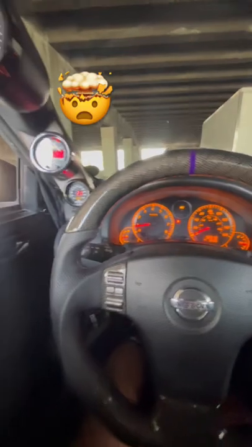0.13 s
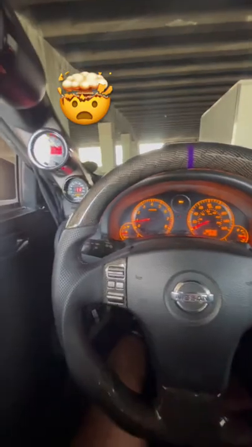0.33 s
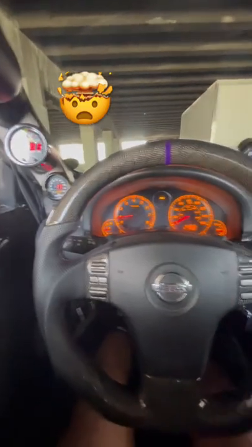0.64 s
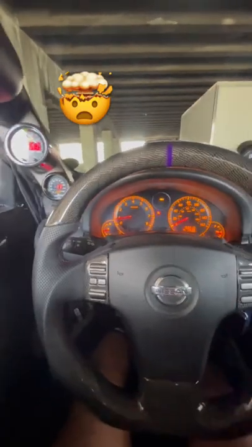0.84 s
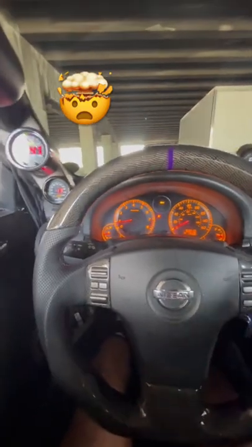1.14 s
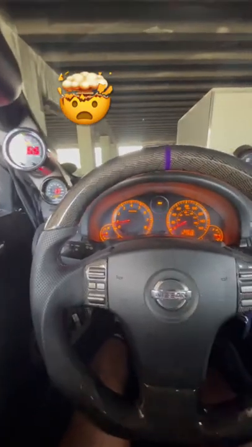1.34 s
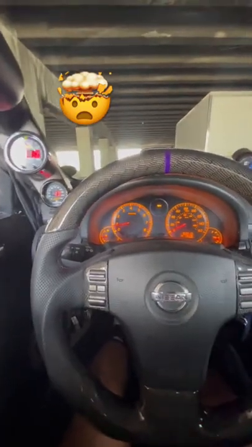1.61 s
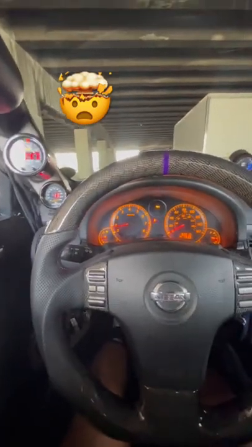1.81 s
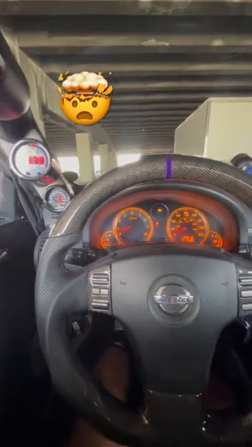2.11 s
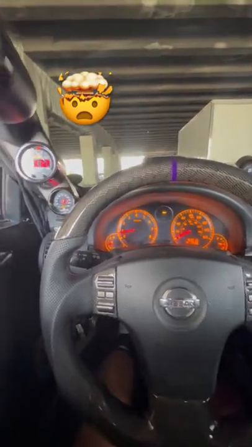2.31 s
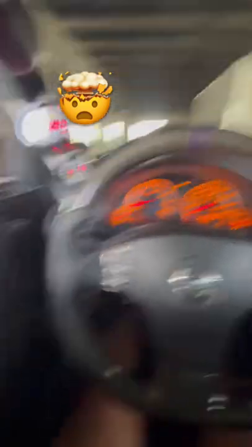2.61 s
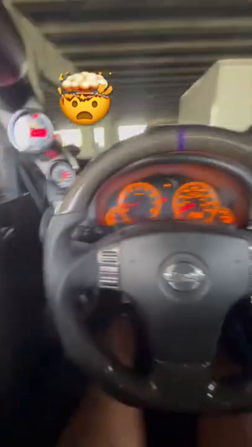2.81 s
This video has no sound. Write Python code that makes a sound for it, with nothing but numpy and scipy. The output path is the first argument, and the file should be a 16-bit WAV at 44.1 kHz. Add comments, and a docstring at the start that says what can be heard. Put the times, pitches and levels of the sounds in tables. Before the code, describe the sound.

A car engine drones throughout, heard inside the cabin on a handheld microphone: a low, fluttering, nearly steady hum over boomy rumble and dull mechanical roar. A very faint air puff comes near 1.7 seconds. At about 2.35 a turbo valve releases a clear ringing hiss, with an after-puff at 2.5 and a thin high whine around it. From 2.6 a breathy whistle swells to the end.

```python
"""Car cabin with engine drone and valve hiss

Inside a car with the engine running: wavering sine lines at the firing tone and other crank orders drone
among boomy cabin resonances of filtered noise, over a wide engine-bay roar and a second rotor's steady lines.
Air hisses from the intake valve as shaped noise, once faintly and once in a clear burst with an after-puff;
a thin whine arches around the burst, and a breathy whistle of resonant noise swells at the end."""
import sys
import numpy as np
from scipy import signal
from scipy.fft import rfft, irfft
from scipy.io import wavfile

SR = 44100
rng = np.random.default_rng(int(sys.argv[2]) if len(sys.argv) > 2 else 0)


def inscribe(sig):
    """Save sig as 16-bit PCM at rate SR to the path in sys.argv[1].

    A 1-D sig is mono; a 2-D sig holds one channel per row.
    Samples are clipped to [-1, 1] before scaling.
    """
    pcm = np.round(np.clip(np.atleast_2d(sig).T, -1, 1) * 32767)
    wavfile.write(sys.argv[1], SR, pcm.astype(np.int16))


N = 130095


def amp(db):
    """Turns decibels into an amplitude factor."""
    return 10 ** (np.asarray(db) / 20)


def rms_one(x):
    """Scales a signal to rms 1."""
    return x / np.sqrt(np.mean(x ** 2) + 1e-20)


def over_time(points, t):
    """Reads a (time, value) table in straight lines."""
    return np.interp(t, *np.transpose(points))


def at_hz(points, hz):
    """Reads a spectrum table on a log-frequency axis."""
    p = np.array(points, float)
    return np.interp(np.log(hz + 1), np.log(p[:, 0] + 1), p[:, 1])


def drift(rate_hz):
    """Slow chance with spread 1: noise through two equal low-pass poles, drawn every 40 samples."""
    r = np.exp(-80 * np.pi * rate_hz / SR)
    noise = rng.standard_normal(N // 40 + 2002)
    slow = signal.lfilter([1], [1, -2 * r, r * r], noise)[2000:]  # drops the filter's settling
    return np.interp(np.arange(N) / 40, np.arange(len(slow)), rms_one(slow))


def coloured(db_at, patchy_db, low=8):
    """Two noises in overlapping half-octave bands, each band flickering a little; rms 1."""
    hz = np.arange(N // 2 + 1) * SR / N
    spectra = rfft(rng.standard_normal((2, N))) * amp(db_at(hz))
    together = drift(6.0)  # flicker common to all bands
    out = 0
    for centre in np.arange(low, 29):  # in half octaves above 1 Hz
        band = np.clip(1 - np.abs(2 * np.log2(hz + 1) - centre), 0, 1)
        flicker = amp(patchy_db * (.5 * together + drift(11)))
        out = out + irfft(spectra * band, N) * flicker
    return rms_one(out)


def resonance(hz, width_hz):
    """Two noises passed twice through one two-pole resonance; rms 1."""
    r = np.exp(-np.pi * width_hz / SR)
    x = rng.standard_normal((2, N + SR))
    for _ in range(2):
        x = signal.lfilter([1, 0, -1], [1, -2 * r * np.cos(2 * np.pi * hz / SR), r * r], x)
    return rms_one(x[:, SR:])


def engine(t):
    """The firing tone and other crank orders, clean lines in step that waver, with rough whines above."""
    # pitch of the firing tone: start_s, pitch_hz (before jitter)
    firing_pitch = [(0.04, 139), (0.11, 137.5), (0.42, 129.9), (1.17, 130.4), (1.56, 127.5), (1.8, 131.1),
                    (2.06, 129.4), (2.24, 132.5), (2.79, 132.6), (2.95, 129.6)]
    # strength of the firing tone: start_s, level_db (rms)
    firing_level = [(0.04, -24), (0.1, -18), (0.17, -18.5), (0.2, -29), (0.24, -16.5), (0.3, -27.5),
                    (0.33, -20), (0.36, -27.5), (0.4, -15.5), (0.44, -31), (0.48, -19), (0.53, -24),
                    (0.57, -12), (0.63, -20), (0.67, -31.5), (0.74, -16), (0.9, -14.5), (1.0, -25),
                    (1.15, -24.5), (1.22, -16.5), (1.32, -16.5), (1.36, -12.5), (1.5, -17.5), (1.57, -31.5),
                    (1.65, -17), (1.78, -19.5), (1.82, -35), (1.85, -21), (1.98, -19.5), (2.01, -23.5),
                    (2.06, -24), (2.1, -15), (2.15, -20), (2.18, -13.5), (2.23, -20.5), (2.35, -17),
                    (2.52, -20), (2.55, -16), (2.6, -20.5), (2.64, -15), (2.68, -20.5), (2.71, -18.5),
                    (2.92, -18), (2.95, -20.5)]
    # other crank orders: multiple of shaft speed, level_db (before waver)
    orders = [(1, -34.5), (2, -30), (4, -38.5), (4.5, -40), (5, -42), (6, -45.5)]
    # rough whines that follow the shaft: multiple of shaft speed, roughness_hz, level_db (before swings)
    whines = [(22.25, 14, -49), (58.75, 12, -52.5)]
    firings_per_turn, pitch_jitter = 3, .003  # jitter as a share of pitch
    orders_follow = 0.22  # share of the firing tone's dips felt by the other orders
    order_waver_db, order_waver_hz = 2.5, 4
    whine_db_per_hz = 0.64  # whines grow with engine speed

    hz, firing_db = over_time(firing_pitch, t), over_time(firing_level, t)
    turns = np.cumsum(hz * (1 + pitch_jitter * drift(8.0))) / SR / firings_per_turn
    out = amp(firing_db) * np.cos(2 * np.pi * firings_per_turn * turns)
    for k, level_db in orders:
        sway_db = orders_follow * (firing_db - firing_db.mean()) + order_waver_db * drift(order_waver_hz)
        out = out + amp(level_db + sway_db) * np.cos(2 * np.pi * k * turns)
    for k, rough_hz, level_db in whines:
        level = amp(level_db + whine_db_per_hz * (hz - hz.mean()))
        pair = []
        for _ in range(2):  # unrelated copies for the two ports
            line = np.sin(2 * np.pi * (k * turns + rng.random()))
            pair.append((.5 + drift(rough_hz)) * line)
        out = out + level * np.array(pair)
    return np.sqrt(2) * out


def rumble_swell(t):
    """Slow gain shared by the deep cabin booms and the second rotor."""
    # deep rumble under the firing tone: start_s, level_db (used relative to its mean)
    rumble = [(0.04, -22), (0.3, -20), (0.5, -24), (0.8, -22.5), (1.2, -23), (1.6, -23), (1.9, -21),
              (2.25, -20), (2.5, -21), (2.95, -21)]
    deep_db = over_time(rumble, t)
    return amp(deep_db - deep_db.mean())


def rotor(t):
    """Steady sine lines at multiples of the second rotor's speed, each wavering slightly in level."""
    # rotor lines: multiple of rotor speed, level_db (before waver)
    lines = [(1, -34), (2, -26.5), (3, -39), (4, -35), (12, -50)]
    rotor_hz, waver_db = 36.68, 1.5
    out = 0
    for k, level_db in lines:
        line = np.sin(2 * np.pi * (k * rotor_hz * t + rng.random()))
        out = out + amp(level_db + waver_db * drift(1.3)) * line
    return np.sqrt(2) * out


def cabin_boom(deep):
    """Cabin resonances shaken by uneven firings, made as resonant noise; the lowest follow the rumble."""
    # cabin resonances: pitch_hz, width_hz, level_db (before the rumble swell)
    modes = [(32.2, 14, -32), (60.1, 10, -30.5), (72, 24, -28.5), (122.7, 6.6, -37.5), (171.5, 6.5, -43),
             (199.6, 22, -41.5), (250.5, 6.2, -39.5), (336.2, 11, -45), (369.4, 22, -45.5),
             (410.3, 5.9, -52.5)]
    rumble_top_hz = 105
    out = 0
    for hz, width_hz, level_db in modes:
        swell = deep if hz < rumble_top_hz else 1
        out = out + amp(level_db) * resonance(hz, width_hz) * swell
    return out


def roar(t):
    """Broad mechanical noise with its metallic rings, rising with load."""
    # engine-bay roar through the firewall: pitch_hz, density_db (relative, per Hz)
    colour = [(40, -16.5), (88, -8.5), (150, -8), (250, -17.5), (400, -19.5), (760, -28), (1000, -27),
              (1500, -30.5), (2100, -32.5), (2700, -29), (3500, -33), (4000, -36), (4600, -36.5),
              (4900, -36.5), (5800, -39.5), (7000, -47), (8000, -51), (10000, -60.5), (12400, -62.5),
              (14000, -71.5), (15500, -88)]
    # broad metallic rings: pitch_hz, width_hz, level_db (before load)
    metal = [(625, 90, -49.5), (890, 100, -50.5), (973, 135, -48), (2636, 300, -51), (3340, 400, -54.5),
             (5810, 840, -54.5)]
    # vigour of the roar and rings: start_s, gain_db
    load = [(0, 2.5), (.4, 1), (.8, 0.5), (1.5, 1.5), (1.9, 1.5), (2.2, 1.85), (2.55, 3.5), (2.75, 2.5),
            (2.95, 2)]
    body_db, patchy_db, low_hz = -29, 1, 24.6  # body level before load

    def density_db(hz):
        return at_hz(colour, hz) - 40 * (hz < low_hz)

    body = amp(body_db) * coloured(density_db, patchy_db)
    rings = sum(amp(level_db) * resonance(hz, width_hz) for hz, width_hz, level_db in metal)
    return (body + rings) * amp(over_time(load, t))


def valve(t):
    """Each puff of air swells, holds, drops and then leaks away; the nozzle rings as it opens."""
    # air let off: start_s, level_db (before the envelope), swell_s, brightness (dB per octave)
    puffs = [(1.655, -59, 0.05, 13), (2.34, -38, 0.063, -0.5), (2.505, -47, 0.018, 1)]
    # colour of the escaping air: pitch_hz, density_db (relative, per Hz)
    air_colour = [(1200, -22), (2000, -8), (2750, -8.5), (3500, -1), (4200, -9.5), (5400, -3.5),
                  (7000, -12), (9000, -15.5), (12000, -19.5), (14000, -27.5), (15700, -29)]
    hold_s, drop_db_per_s, tail_db, tail_db_per_s = 0.05, 70, -8.5, 24
    patchy_db = 1.5
    nozzle_hz, nozzle_width_hz, nozzle_db = 2675, 320, 9.5  # relative to the puff, at zero brightness
    rise_s, fade_s = .035, 0.1  # time constants: the ring comes early and dies first
    flutter_db, flutter_hz = 2.5, 30

    out = 0
    for start_s, level_db, swell_s, bright in puffs:
        since = np.maximum(t - start_s, 0)
        after = np.maximum(t - start_s - swell_s - hold_s, 0)
        swell = np.minimum(since / swell_s, 1)
        fall = amp(-drop_db_per_s * after) + amp(tail_db - tail_db_per_s * after)

        def density_db(hz):
            return at_hz(air_colour, hz) + bright * np.log2((hz + 1) / nozzle_hz)

        air = swell * fall * coloured(density_db, patchy_db, low=19)
        ring_shape = (1 - np.exp(-since / rise_s)) * np.exp(-since / fade_s)
        ring = ring_shape * resonance(nozzle_hz, nozzle_width_hz) * amp(flutter_db * drift(flutter_hz))
        # brighter puffs ring less
        out = out + amp(level_db) * (air + amp(nozzle_db - 2.6 * bright) * ring)
    return out


def thin_whine(t):
    """Narrow resonant noise around the burst, swelling and fading in one arch."""
    start_s, end_s = 2.187, 2.85
    hz, width_hz, level_db = 2293, 9.8, -47.5  # level before the arch
    arch = np.sin(np.pi * np.clip((t - start_s) / (end_s - start_s), 0, 1))
    return amp(level_db) * arch * resonance(hz, width_hz)


def whistle(t):
    """A breathy band of resonant noise that comes up late over a rough, wider body."""
    body = amp(-41.5) * resonance(1145, width_hz=700)
    tone = amp(-40) * resonance(1336, width_hz=85)
    body_start_s, body_rise_s = 2.55, .2
    tone_start_s, tone_rise_s = 2.775, 0.091
    body_swell = np.clip((t - body_start_s) / body_rise_s, 0, 1)
    tone_swell = np.clip((t - tone_start_s) / tone_rise_s, 0, 1)
    return tone_swell * tone + body_swell * body


def ports(first, second):
    """Two microphone ports: the second, unrelated copy supplies what they do not share."""
    # how alike the ports sound: pitch_hz, likeness (0-1)
    likeness = [(60, .985), (130, .985), (345, .96), (650, .15), (1030, .3), (1400, .18), (1720, .35),
                (2070, .12), (2700, .7), (3300, .58), (3800, .2), (4500, .27), (5200, .72), (6500, .74),
                (7200, .55), (8400, .7), (9000, .45), (10000, .93), (13000, .9)]
    # phase by which left leads: pitch_hz, lead (radians)
    left_lead = [(0, 0), (130, -.08), (520, .2), (950, 1.0), (1640, .2), (2580, -1.8), (5080, -3.1),
                 (6550, -2.5), (8700, .6), (9560, 3.1), (10900, 3.2), (11800, 6.4), (13400, 6.2),
                 (13900, 9.3), (15200, 9.5)]
    # left minus right: pitch_hz, level_db
    balance = [(60, 0), (110, -1), (200, -0.5), (380, 1.5), (700, 2.5), (1290, 6), (2380, 1.5),
               (4400, -0.5), (8120, 0.5), (15000, 0.5)]
    pad = SR // 4  # mirrored, tapered ends avoid wrap-around clicks
    size = N + 2 * pad
    hz = np.arange(size // 2 + 1) * SR / size
    taper = signal.windows.tukey(size, pad / size)

    def spectrum(x):
        return rfft(np.pad(x, pad, "reflect", reflect_type="odd") * taper)

    a, b = spectrum(first), spectrum(second)
    alike = np.clip(at_hz(likeness, hz), 0, 1)
    lead = np.interp(hz, *np.transpose(left_lead))
    tilt = amp(at_hz(balance, hz) / 2)
    right = (alike * a + np.sqrt(1 - alike ** 2) * b) * np.exp(-1j * lead)
    return np.array([irfft(a * tilt, size), irfft(right / tilt, size)])[:, pad:pad + N]


def scene():
    """Sums every source and sends the mix to the two ports."""
    t = np.arange(N) / SR
    deep = rumble_swell(t)
    drone = engine(t) + deep * rotor(t) + cabin_boom(deep)
    mix = drone + roar(t) + valve(t) + thin_whine(t) + whistle(t)
    return ports(*mix)


def record(dry):
    """Opens quickly after a moment of silence; a steep low-pass cuts the top."""
    start_s, open_s, cutoff_hz = .0355, 0.00067, 16200
    gate = np.clip((np.arange(N) / SR - start_s) / open_s, 0, 1)
    low_pass = signal.cheby2(12, 70, cutoff_hz, fs=SR, output="sos")
    return signal.sosfilt(low_pass, dry * gate)


dry = scene()
out = record(dry)
inscribe(out)
```